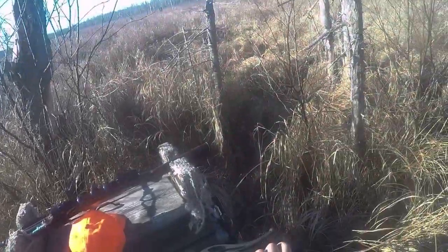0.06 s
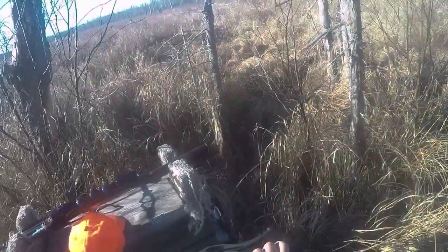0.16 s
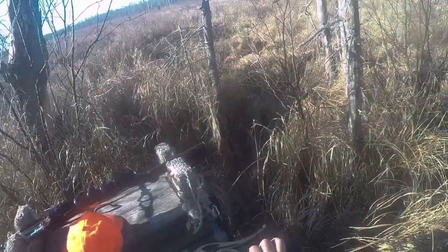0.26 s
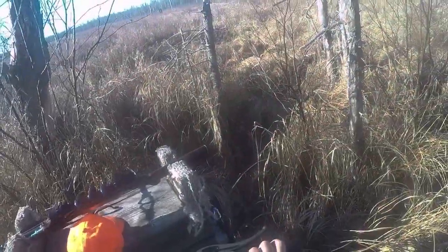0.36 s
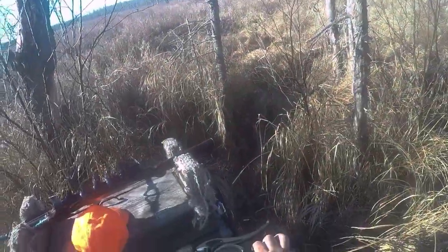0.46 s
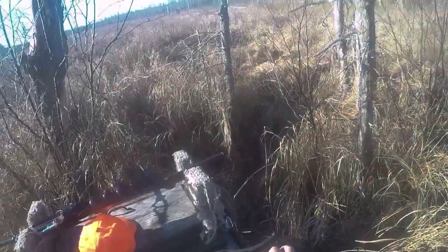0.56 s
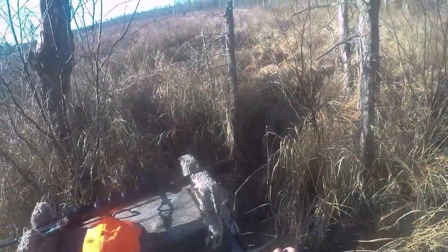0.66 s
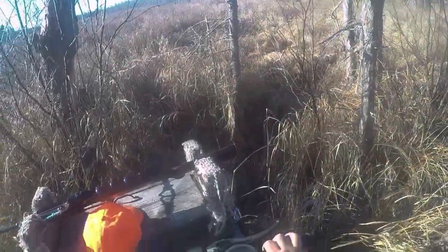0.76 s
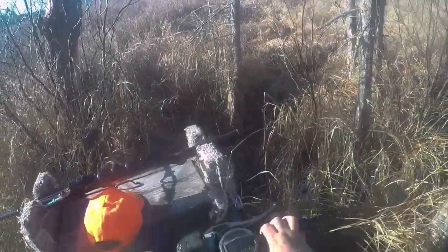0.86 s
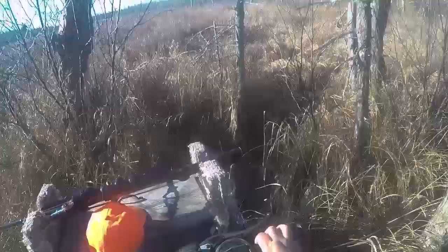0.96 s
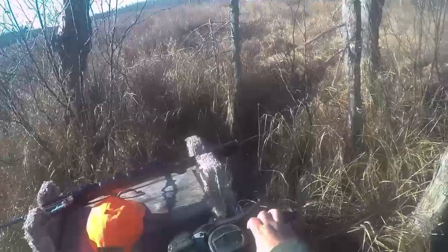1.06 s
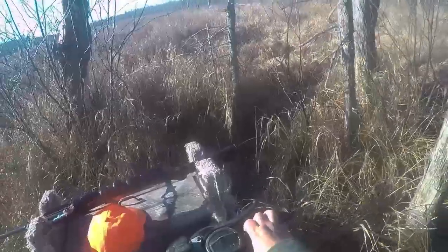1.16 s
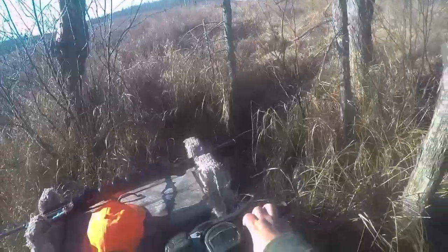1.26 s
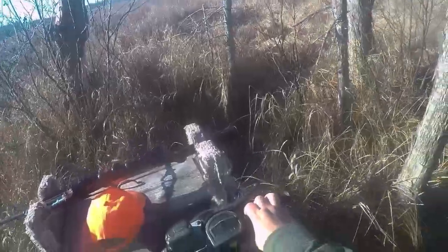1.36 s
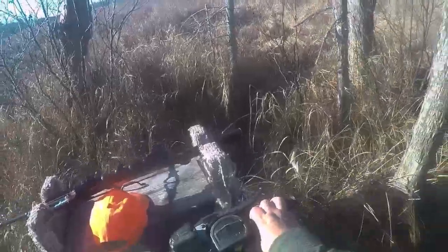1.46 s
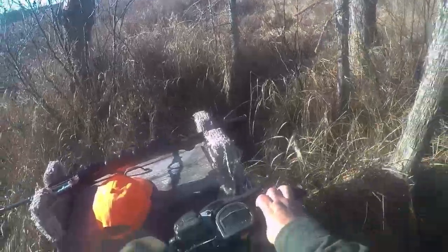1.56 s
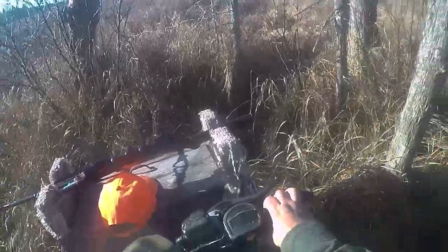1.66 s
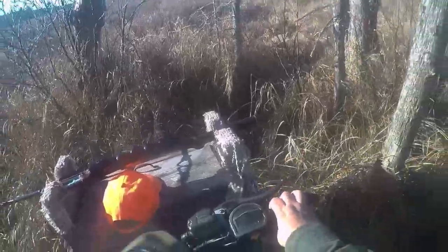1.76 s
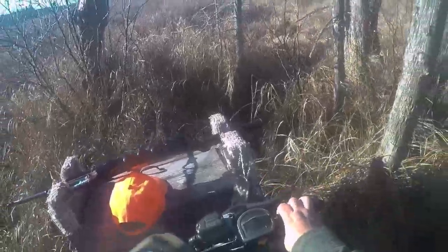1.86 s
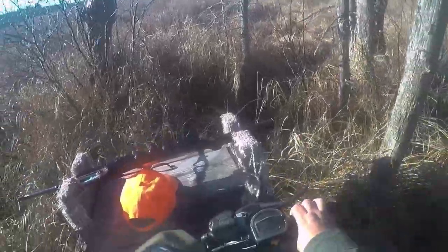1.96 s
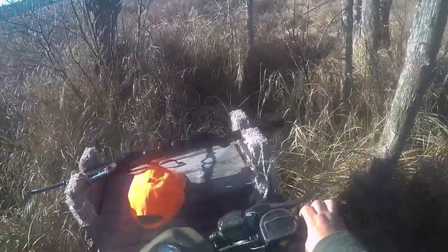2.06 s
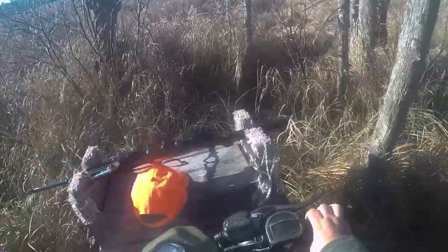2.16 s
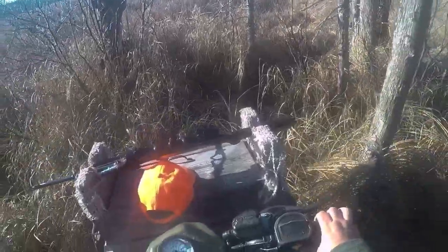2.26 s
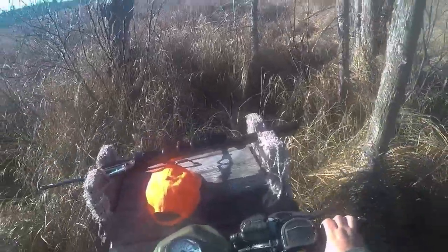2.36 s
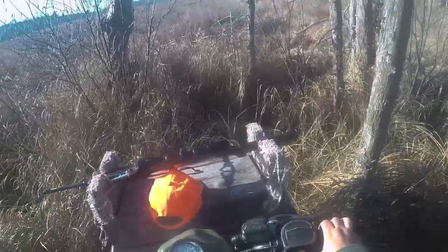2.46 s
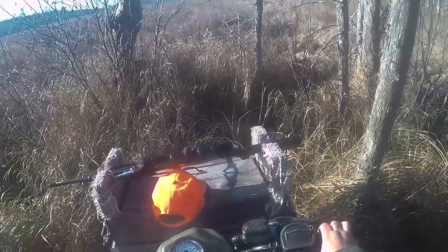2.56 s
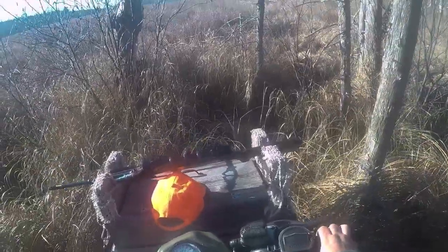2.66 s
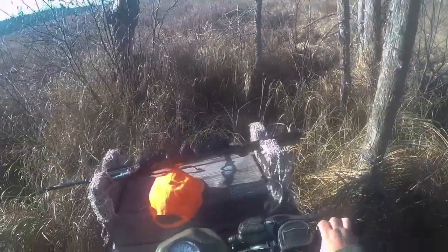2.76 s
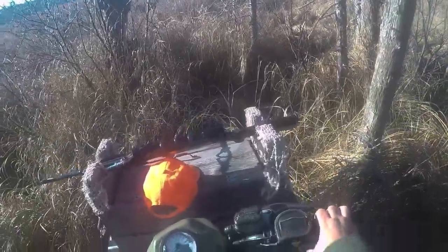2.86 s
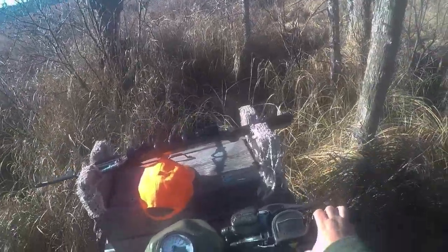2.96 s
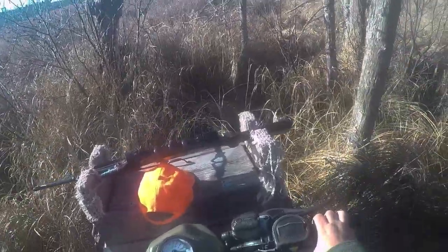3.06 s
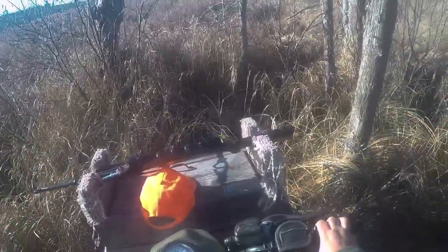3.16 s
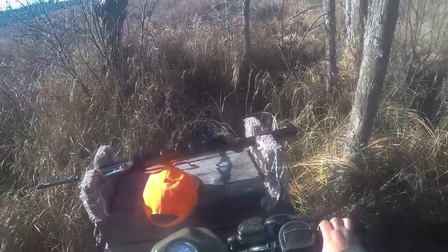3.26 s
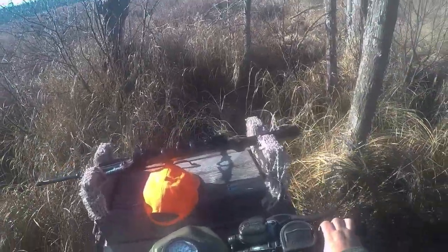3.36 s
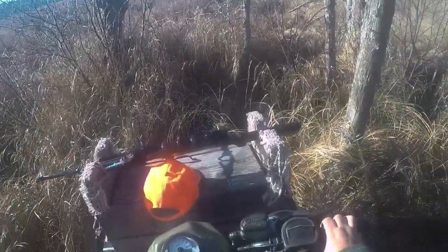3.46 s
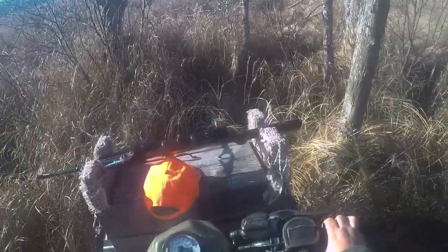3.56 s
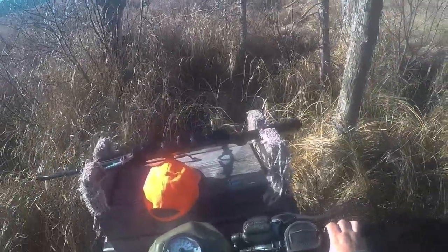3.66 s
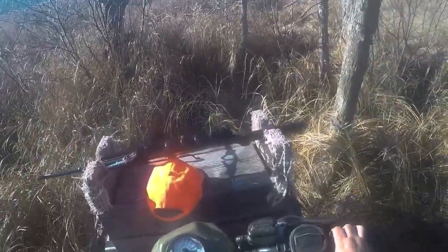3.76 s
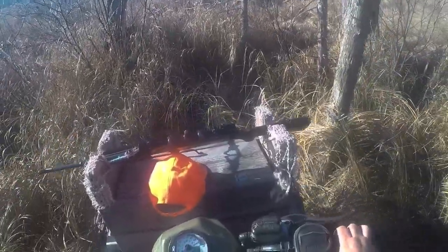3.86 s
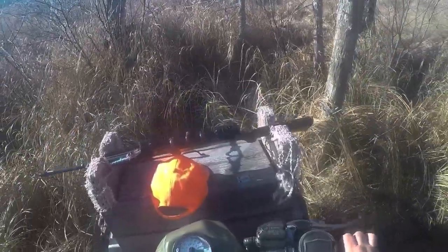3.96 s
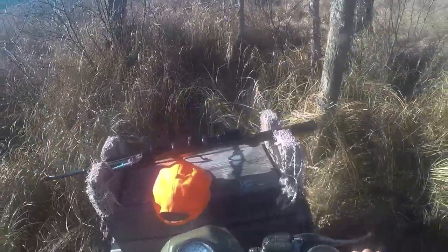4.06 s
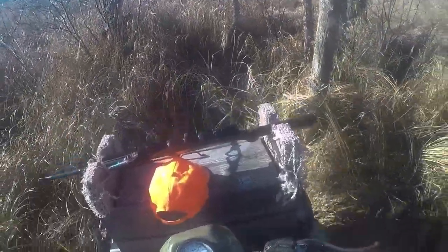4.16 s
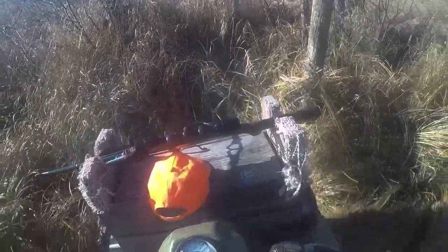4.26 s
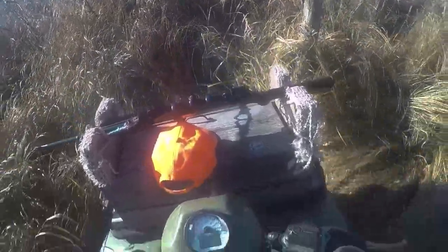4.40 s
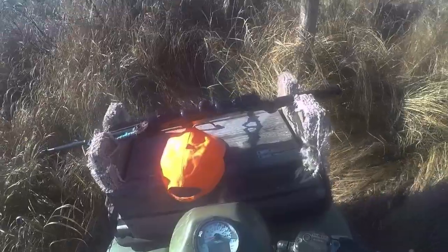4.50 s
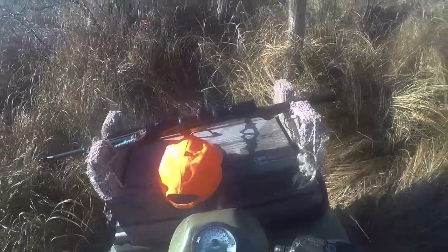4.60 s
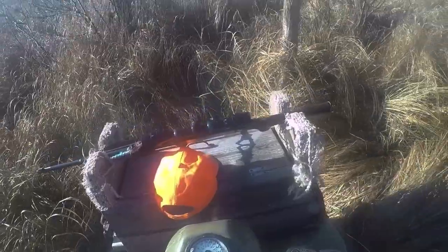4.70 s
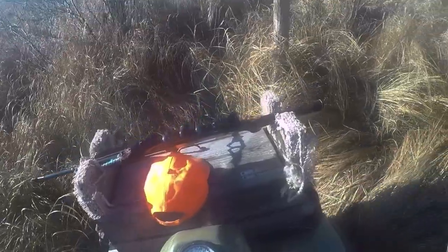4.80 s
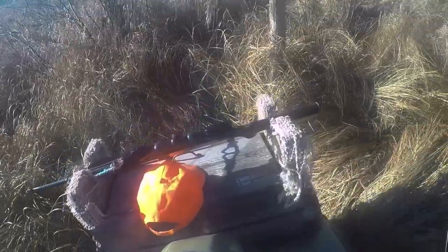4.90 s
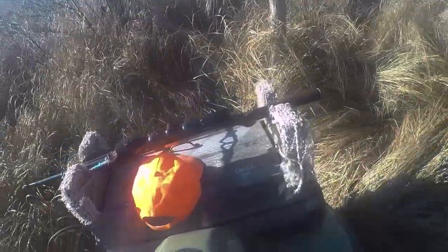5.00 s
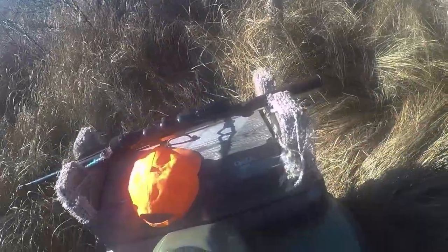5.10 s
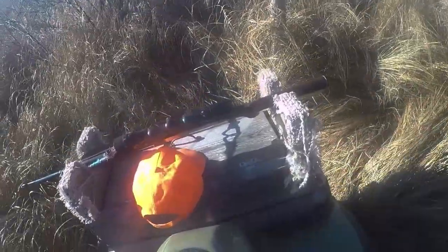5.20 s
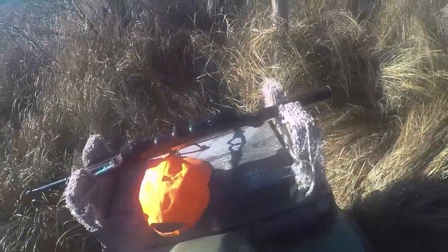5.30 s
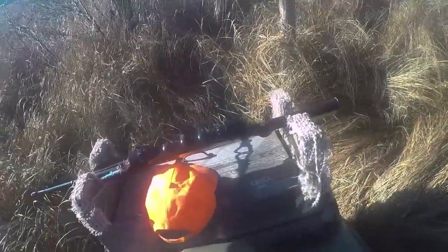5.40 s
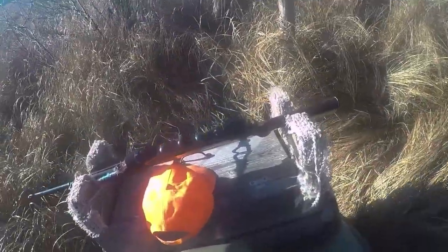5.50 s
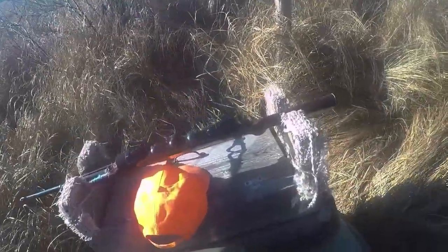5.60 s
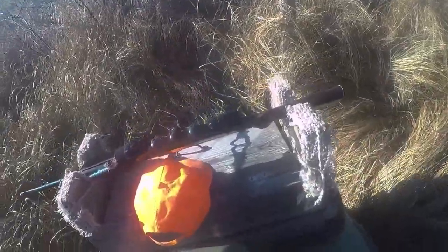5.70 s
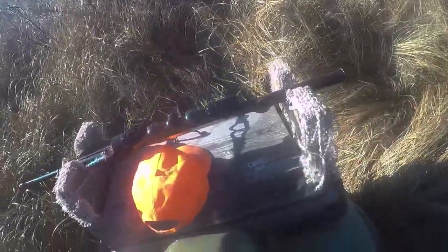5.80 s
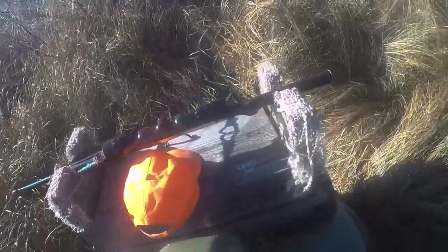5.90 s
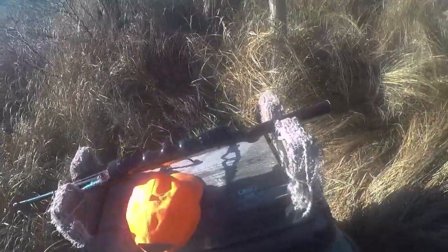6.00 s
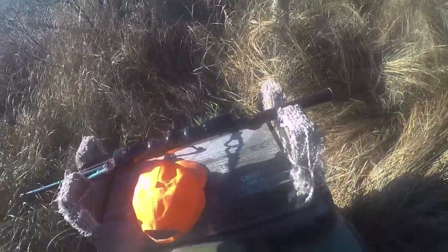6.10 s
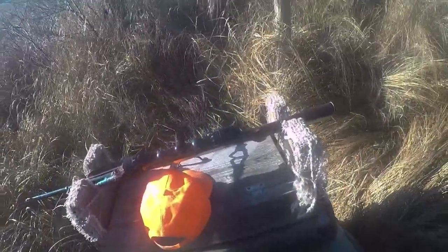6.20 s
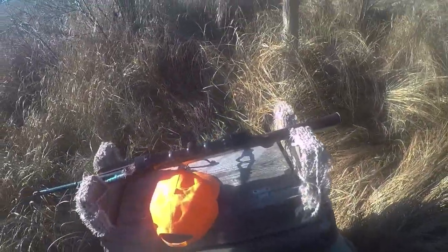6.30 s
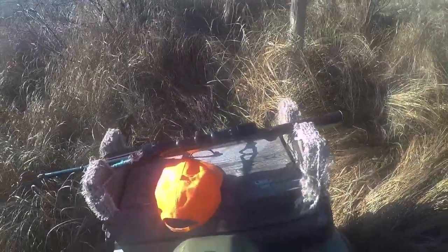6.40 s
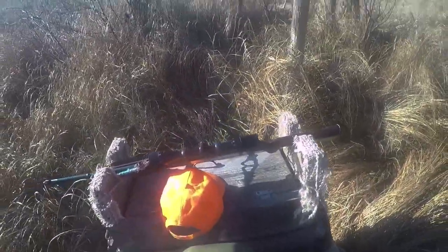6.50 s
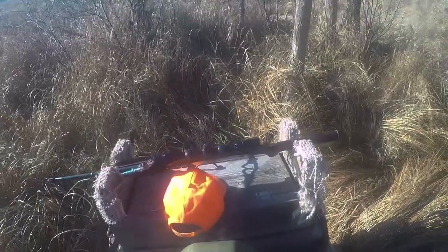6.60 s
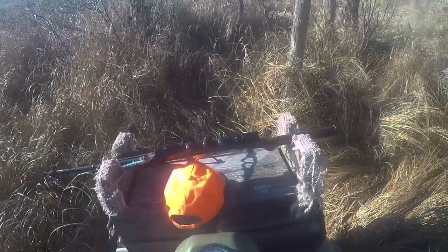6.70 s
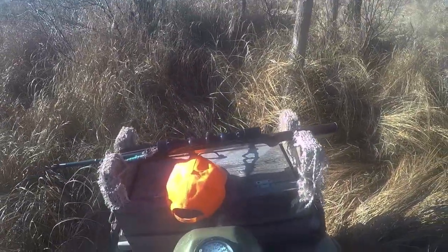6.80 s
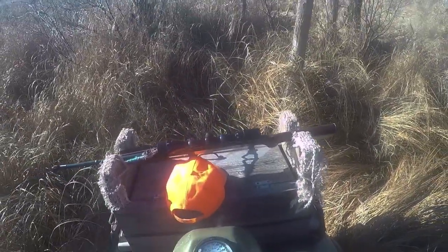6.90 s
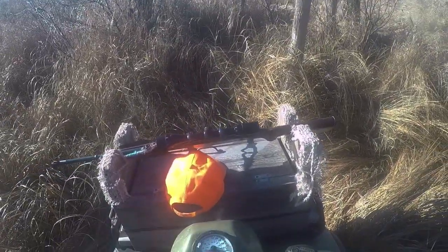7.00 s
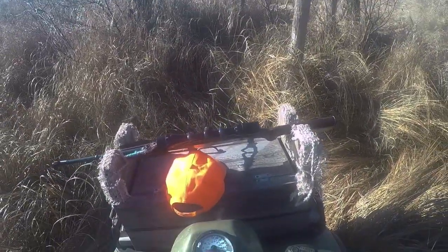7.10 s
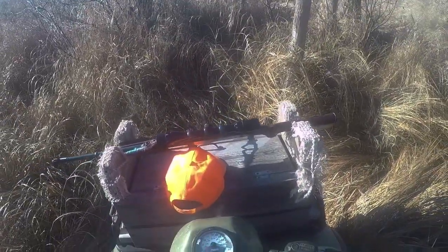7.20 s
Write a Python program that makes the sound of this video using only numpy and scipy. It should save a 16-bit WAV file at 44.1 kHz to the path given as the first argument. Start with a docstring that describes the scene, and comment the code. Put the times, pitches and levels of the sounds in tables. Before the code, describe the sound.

Close on a quad bike from the saddle, outdoors: the single-cylinder engine starts at idle, clanks as it picks up, and growls through three short throttle squeezes and one longer pull. Valve ticks and metallic casing clatter run throughout. Dry grass swishes along the body and stalks snap. The throttle closes, the engine sinks to a slow thudding idle, something knocks a panel, and the revs rise at the end.

```python
"""In tall dry grass a single-cylinder quad bike crawls along, heard from the saddle.
Four squeezes of the throttle, a run-down to a thudding idle, then a fresh pick-up set the firing rate.
Exhaust and induction are harmonics, impulses and filtered noise locked to the firing cycle.
Valves tick and the casing clatters as noise flaring at each contact; clanks mark hard firings.
Grass brushes the body as filtered noise, stalks snap as short bursts, and a knock rings a panel."""
import sys
import numpy as np
from scipy import signal
from scipy.fft import rfft, irfft, next_fast_len
from scipy.io import wavfile
from scipy.ndimage import uniform_filter1d, map_coordinates

SR = 44100
rng = np.random.default_rng(int(sys.argv[2]) if len(sys.argv) > 2 else 0)


def output_pcm(signal):
    """Save a mono or channel-first signal as 16-bit PCM at the path in sys.argv[1].

    Samples are clipped to [-1, 1] before scaling.
    """
    pcm = np.clip(np.atleast_2d(signal).T, -1, 1) * 32767
    wavfile.write(sys.argv[1], SR, np.round(pcm).astype(np.int16))


N = 319725
T = np.arange(N) / SR  # time, s

# Firing rates per second: at idle, where the clutch bites, on the move
IDLE_HZ, CLUTCH_HZ, CRUISE_HZ = 12.436, 18.214, 29
GRIP_HZ = 7.15  # firings/s above its bite at which the clutch holds fully
DRAG_LOAD = 0.26  # greatest load (0-1) as the revs spin with the throttle shut
GULP_DB_PER_HZ = 0.39  # a deeper squeeze breathes louder: dB per firing/s aimed above cruise
BOOM_DB = 3  # added to the shut-throttle exhaust as the revs rise from idle to the clutch bite

# Loudness laws of the engine layers, before each layer's own trim. Each law: base level at idle in dB,
# dB per doubling of speed, dB more under load, dB per firing/s above cruise under load,
# dB more while the revs flare against a slipping clutch.
EXHAUST_LAW = (-21.5, 4.5, 0.3, 0.37, 1.5)
INTAKE_LAW = (-42, 11.5, -1, 0.62, 5)
CASING_LAW = (-45.5, 9.5, 1.5, 0.2, 3.5)
VALVE_LAW = (-54.5, 13, .3, -0.74, 3.5)
# Spectrum of the intake noise. Each row: frequency in Hz, relative level in dB.
INTAKE_SPECTRUM = [(60, -67), (150, 4.5), (250, 4), (340, -0.5), (450, 0), (620, -4), (780, -4), (1100, -8),
                   (1600, -13.5), (4000, -70)]
# Spectrum of the valve ticks. Each row: frequency in Hz, relative level in dB.
VALVE_SPECTRUM = [(1500, -19.5), (4000, -1.5), (6500, -6), (7800, -0.5), (8600, -14), (9400, -2),
                  (10100, -7), (10800, 1.5), (11300, 0.5), (12400, -2), (13000, 8), (13700, -7),
                  (15300, -9.5)]


def engine():
    """Cyclic excitation: exhaust, intake gulps, casing clatter and valve ticks share one firing cycle."""
    speed = revs()
    opening, aim = throttle()
    spin = np.clip((speed - IDLE_HZ) / (CLUTCH_HZ - IDLE_HZ), 0, 1)
    grip = np.clip((speed - CLUTCH_HZ) / GRIP_HZ, 0, 1)
    load = np.clip(np.maximum(opening * grip, DRAG_LOAD * spin), 0, 1)
    flare = opening * (1 - grip)
    cycle = np.cumsum(speed) / SR + .06  # firings so far

    exhaust_db = loudness(EXHAUST_LAW, speed, load, flare)
    casing_db = loudness(CASING_LAW, speed, load, flare)
    intake_db = loudness(INTAKE_LAW, speed, load, flare) + GULP_DB_PER_HZ * aim
    valve_db = loudness(VALVE_LAW, speed, load, flare) + 0.58 * wobble(7)

    growl = amp(intake_db + 6.0) * roar(cycle, speed, waver_db=1.9, drift_db=3.0, even_db=1.5)
    pulling = amp(exhaust_db) * drone(cycle, speed, firing_lead=.1) + growl
    coasting = amp(exhaust_db + BOOM_DB * spin) * thuds(
        cycle, speed, coast_lead_s=0.0098, idle_lead_s=0.0118, ring_lead_s=0.00391, ring_db=-17.5)
    gulps = unit(1 + 0.2 * np.cos(2 * np.pi * (cycle - .75))) * rng.standard_normal(N)
    intake = amp(intake_db - .5 - 4.5 * load) * colour(gulps, INTAKE_SPECTRUM)
    ticks = rattle(cycle, load, t60=0.022, bed=0.093, scatter_db=6.0)
    valves = amp(valve_db - 1.0 + 1.38 * load) * colour(ticks, VALVE_SPECTRUM)
    clatter = amp(casing_db) * casing(cycle, load)
    # the exhaust crossfades at equal power between pulling and coasting
    return np.sqrt(load) * pulling + np.sqrt(1 - load) * coasting + intake + clatter + valves


# Exhaust harmonics under load. Each row: frequency in Hz, relative level of a harmonic there in dB.
LOADED_EXHAUST = [(28, -9), (57, 0), (86, -3), (117, -1)]


def drone(cycle, speed, firing_lead, count=5):
    """Harmonic synthesis: the lowest orders; even follow the crank, odd the firing, a little ahead."""
    tone = 0
    for k in range(1, count):
        turns = cycle + firing_lead * (k % 2)
        tone = tone + amp(along(LOADED_EXHAUST, k * speed)) * np.cos(2 * np.pi * k * turns)
    return -unit(tone)


# Pipe resonances met by the higher harmonics. Each row: frequency in Hz, relative level in dB.
ROAR_SPECTRUM = [(140, 2), (175, -3), (205, 0.5), (232, 1.5), (262, -6.5), (292, -3.5), (322, -6.5),
                 (385, -6.5), (450, -16), (570, -11), (680, -15), (780, -21), (1200, -23.5)]


def roar(cycle, speed, waver_db, drift_db, even_db, order=5, count=40):
    """Source and filter: higher harmonics slide through fixed pipe resonances, each wavering in level."""
    tone = np.zeros(N)
    knots = T[::SR // 25]
    knot_speed = np.interp(knots, T, speed)
    for k in range(order, count):
        level_db = along(ROAR_SPECTRUM, k * knot_speed) + waver_db * rng.standard_normal(len(knots))
        drift = unit(uniform_filter1d(rng.standard_normal(len(knots)), size=14))
        level_db += even_db * (k % 2 == 0) + drift_db * drift
        phase = 2 * np.pi * (k * cycle + rng.random())
        tone += np.interp(T, knots, amp(level_db)) * np.cos(phase)
    return unit(tone)


# Exhaust thud with the throttle shut, above idle. Each row: frequency in Hz, relative level in dB.
COASTING_THUD = [(8, -18), (25, -19.5), (52, -10.5), (71, -3), (79, 8), (87, -2), (118, -12.5),
                 (160, -29.5), (300, -44), (900, -91)]
# Exhaust thud at idle. Each row: frequency in Hz, relative level in dB.
IDLE_THUD = [(4, -33), (14, -8), (30, -18.5), (54, 12), (80, 2.5), (110, -3), (160, -26), (300, -62),
             (900, -103)]
# Hollow ring of the muffler. Each row: frequency in Hz, relative level in dB.
MUFFLER_RING = [(60, -53), (160, -16.5), (218, 5.5), (255, -10.5), (285, -8), (340, -23), (450, -45),
                (600, -28), (1500, -76)]


def thuds(cycle, speed, coast_lead_s, idle_lead_s, ring_lead_s, ring_db):
    """Impulse response: each firing rings the pipe, deeper at idle; the muffler answers just after."""
    size = np.sqrt(SR / speed)  # unit power at any firing rate
    booms = size * strokes(cycle + coast_lead_s * speed, 0, scatter_db=1.6)
    puffs = size * strokes(cycle + idle_lead_s * speed, 0, scatter_db=0.9)
    puffs[0] = size[0]  # the engine is already turning
    slaps = size * strokes(cycle + ring_lead_s * speed, 0, scatter_db=2.5)
    fast = np.clip((speed - 12.5) / 1.6, 0, 1)
    pipe = fast * colour(booms, COASTING_THUD) + (1 - fast) * colour(puffs, IDLE_THUD)
    pipe /= np.sqrt(np.abs(uniform_filter1d(pipe ** 2, SR // 6)) + 1e-9)  # steady running power
    return pipe + amp(ring_db) * colour(slaps, MUFFLER_RING)


def strokes(cycle, phase, scatter_db):
    """Impulse train: one impulse of uneven size each time the engine cycle passes a phase."""
    at = np.flatnonzero(np.diff(np.floor(cycle - phase)) > 0)
    train = np.zeros(N)
    train[at] = amp(scatter_db * rng.standard_normal(512)[:len(at)])
    return train


# Broad clatter of the casing. Each row: frequency in Hz, relative level in dB.
CASING_SPECTRUM = [(500, -33), (1100, -3), (1500, -4.5), (1850, -3.5), (2300, -9), (3300, -6.5),
                   (4500, -9.5), (5300, -12), (6800, -20.5), (9000, -16), (15000, -34)]
# Ringing modes of the casing. Each row: frequency in Hz, bandwidth in Hz, level in dB when pulling,
# level in dB with the throttle shut, both before a slow random drift.
CASING_MODES = [(1276, 74, -10.5, -13), (1442, 110, -14, -26), (2066, 20, -14, -13), (2558, 220, -7.5, -9),
                (2923, 120, -10, -11), (3746, 59, -12, -14.5), (4150, 100, -12, -12),
                (5900, 140, -19, -21.5)]


def casing(cycle, load):
    """Modal resonance: broad clatter plus modes, each with its own strikes, slowly coming and going."""
    clatter = rattle(cycle, load, t60=0.028, bed=0.82, scatter_db=2.0)
    sound = amp(-2.5) * colour(clatter, CASING_SPECTRUM)
    for hz, width, pull_db, shut_db in CASING_MODES:
        ring = resonate(rattle(cycle, load, t60=0.045, bed=0.84, scatter_db=5.0), hz, width)
        drift_db = 1.8 * wobble(4)
        sound += amp(load * pull_db + (1 - load) * shut_db + drift_db) * ring
    return sound


# Valve gear contacts in each cycle. Each row: phase (0-1), strength in dB weighted by the load,
# strength in dB weighted by 1.5 minus the load.
VALVE_CONTACTS = [(0.169, -37, 0), (0.239, -1, -1.5), (0.292, -10, 2), (.55, -11, -3.5), (0.64, -1, -4),
                  (0.729, 1, -7), (.79, -1.5, -4), (.95, -1, -4.5)]


def rattle(cycle, load, t60, bed, scatter_db):
    """Modulated noise: it flares at each loosely timed contact over a running bed; mean power near 1."""
    phase, hard_db, soft_db = np.transpose(VALVE_CONTACTS)
    turns = np.arange(int(cycle[-1]) + 1)[:, None]
    slack, force = rng.standard_normal((2, len(turns), len(VALVE_CONTACTS)))
    at = np.minimum(np.searchsorted(cycle, turns + phase + .012 * slack), N - 1)
    size = amp(load[at] * hard_db + (1.5 - load[at]) * soft_db + scatter_db * force)
    size = size * (at < N - 1)  # drop contacts past the end
    hits = np.bincount(at.ravel(), size.ravel() ** 2, N)
    power = signal.lfilter([1], [1, -amp(-60 / (t60 * SR)) ** 2], hits)  # falls 60 dB in t60
    power /= np.abs(uniform_filter1d(power, SR // 3)) + 1e-9
    return np.sqrt((power + abs(bed)) / (1 + abs(bed))) * rng.standard_normal(N)


def loudness(law, speed, load, flare):
    """Power law: the level in dB of an engine layer follows speed, load and free revving."""
    idle_db, doubling_db, load_db, strain_db, flare_db = law
    speed_db = doubling_db * np.log2(speed / IDLE_HZ)
    return idle_db + speed_db + load * (load_db + strain_db * (speed - CRUISE_HZ)) + flare_db * flare


# Squeezes of the throttle. Each row: start of the rise in seconds, start of the fall in seconds,
# speed it pulls towards in firings/s, lag of the climb in seconds.
SQUEEZES = [(0.164, 0.717, 31.82, 0.286), (0.84, 1.518, 32.658, 0.715), (1.684, 2.095, 33.553, 0.333),
            (2.384, 4.215, 29.381, 0.122), (7.116, 7.6, 29, 0.3)]
# The engine bogs in thick grass, and later undershoots its idle. Each row: middle in seconds,
# firings/s lost, width in seconds.
SPEED_SAGS = [(3.142, 1.526, 0.349), (5.023, 1.328, 0.565)]
FLARE_HZ_PER_S, RUN_DOWN_S = 69.152, .29  # fastest climb of the revs; lag of their fall, throttle shut


def revs():
    """First-order lag: revs flare until the clutch drags them into a slow climb; shut, they run down."""
    speed = np.full(N, float(IDLE_HZ))
    for opens, shuts, top, lag in SQUEEZES:
        age, start = np.maximum(T - opens, 0), np.interp(opens, T, speed)
        climb = top - (top - max(start, CLUTCH_HZ)) * np.exp(-age / lag)
        speed = np.where(T > opens, np.minimum(start + FLARE_HZ_PER_S * age, climb), speed)
        excess = np.interp(shuts, T, speed) - IDLE_HZ
        fall = excess * np.exp(-np.maximum(T - shuts, 0) / RUN_DOWN_S)
        speed = np.where(T > shuts, IDLE_HZ + fall, speed)
    return speed - sum(lost * swell(s, width) for s, lost, width in SPEED_SAGS)


OPEN_LEAD_S, OPEN_S, SHUT_S = 0.057, 0.044, 0.051  # lead over the revs; time to open; time to shut


def throttle():
    """Linear ramps: how far the throttle is open (0-1), and how far above cruise it aims (firings/s)."""
    opening, aim = np.zeros(N), np.zeros(N)
    for opens, shuts, top, lag in SQUEEZES:
        rise = (T - opens + OPEN_LEAD_S) / OPEN_S
        squeeze = np.clip(np.minimum(rise, 1 - (T - shuts) / SHUT_S), 0, 1)
        opening = np.maximum(opening, squeeze)
        aim = aim + squeeze * (top - CRUISE_HZ)
    return opening, aim


# Hard firing strokes that clank as the engine picks up. Each row: start in seconds,
# relative level in dB.
CLANKS = [(0.121, -17.5), (0.187, -16.5), (0.24, -19), (0.289, -16.5), (0.332, -16.5), (7.101, -18),
          (7.161, -18.5), (7.214, -18)]


def clanks():
    """Transient excitation: hard firings jolt the casing, most of all around its lowest mode."""
    jolts = sum(amp(db - 15) * burst(s, t60=0.046) for s, db in CLANKS)
    return colour(jolts, CASING_SPECTRUM) + amp(-0.5) * resonate(jolts, hz=1280, width=170)


# Hard knocks on the bodywork. Each row: start in seconds, relative level in dB.
KNOCKS = [(5.866, -18.5)]
# Modes of the struck body panel. Each row: frequency in Hz, relative level in dB,
# time to fall 60 dB in seconds.
PANEL_MODES = [(376, 0.5, 0.071), (535, 6, 0.062), (640, 4, 0.089), (805, -5, .05), (943, 8.5, 0.026),
               (1263, -3.5, 0.063), (1520, -7.5, 0.091), (2340, -2.5, 0.033)]
# Contact noise of the knock. Each row: frequency in Hz, relative level in dB.
CRACK_SPECTRUM = [(300, -8), (700, 7), (1500, -8.5), (4100, -10), (5500, -15.5), (13000, -18), (15000, -25)]


def knocks():
    """Modal decay: something hard strikes a well-damped panel, giving a crack and a short woody ring."""
    sound = np.zeros(N)
    for s, db in KNOCKS:
        age = np.clip(T - s, 0, 1)
        ring = np.zeros(N)
        for k, (hz, level, t60) in enumerate(PANEL_MODES):
            ring += amp(level - 60 * age / t60) * np.sin(2 * np.pi * hz * age) * (-1) ** k
        sound += amp(db - 5.0) * ring + amp(db - 3.5) * colour(burst(s, t60=0.089), CRACK_SPECTRUM)
    return sound


# Stalks snapping. Each row: start in seconds, relative level in dB, centre in Hz,
# time to fall 60 dB in seconds.
SNAPS = [(1.6708, -16.5, 2050, 0.018), (1.926, -18, 2480, 0.014), (2.373, -14, 3700, 0.014),
         (3.3812, -22, 4150, 0.011), (5.7036, -24, 5770, 0.027), (5.7073, -36, 3830, 0.016),
         (5.789, -34, 2540, 0.015), (6.245, -18, 3070, 0.0068), (7.215, -28, 4270, 0.012)]


def snaps():
    """Brittle fracture: each breaking stalk is a short noise burst with its own spectral peak."""
    sound = np.zeros(N)
    for s, db, hz, t60 in SNAPS:
        spectrum = [(hz / 8, -25), (hz / 2, -5), (hz, 0), (hz * 3, -12)]
        sound += amp(db - 4.5) * colour(burst(s, t60), spectrum, size=2048)
    return sound


# Spectrum of the grass. Each row: frequency in Hz, relative level in dB.
BLADE_SPECTRUM = [(400, 8.5), (1500, -10.5), (3500, -11), (6300, -7.5), (9000, -0.5), (12000, 3),
                  (15300, -1.5)]
# Thick tussocks pushed aside. Each row: peak time in seconds, level in dB before flutter and crackle,
# rise in seconds, fall in seconds.
TUSSOCKS = [(.62, -37.5, .2, 0.29), (1.05, -39, .1, 0.35), (1.85, -38, .3, 0.97), (3.3, -58, 0.11, .2),
            (4.43, -32.5, 0.58, .15), (5.0, -47, 0.55, .25)]
GRASS_REST_DB, GRASS_ROLL_DB = -58, -43.5  # before flutter and crackle: always present, added by rolling


def grass():
    """Friction noise: blades swish along the rolling body, louder in tussocks, with small crackles."""
    power = amp(GRASS_REST_DB) ** 2 + (amp(GRASS_ROLL_DB) * rolling()) ** 2
    for s, db, rise, fall in TUSSOCKS:
        envelope = np.exp(-np.abs(T - s) / np.where(T < s, rise, fall))
        power = power + (amp(db) * envelope) ** 2
    crackles = rng.random(N) < 150 / SR  # about 150 a second
    crackles = crackles * rng.standard_normal(N) * amp(2 * rng.standard_normal(N))
    swish = rng.standard_normal(N) + 0.38 * unit(crackles)
    return np.sqrt(power) * amp(0.71 * wobble(11)) * colour(swish, BLADE_SPECTRUM)


GATHER_S, ROLL_OUT_S = 0.23, 1.5  # time from rest to full pace, time to roll to a stop


def rolling():
    """Uniform acceleration: ground speed (0-1) gathers during each squeeze and runs out after it."""
    pace = np.zeros(N)
    for opens, shuts, top, lag in SQUEEZES:
        gathering = np.minimum(np.interp(opens, T, pace) + (T - opens) / GATHER_S, 1)
        pace = np.where(T > opens, gathering, pace)
        slowing = np.maximum(np.interp(shuts, T, pace) - (T - shuts) / ROLL_OUT_S, 0)
        pace = np.where(T > shuts, slowing, pace)
    return pace


# Spells of faint hiss. Each row: middle in seconds, level in dB,
# half length in seconds (to 1/e of the peak).
SIZZLES = [(5.08, -54.5, .25), (6.9, -54.5, 0.41)]


def sizzle():
    """Narrow-band noise: a faint hiss through one resonance comes and goes."""
    level = sum(amp(db) * swell(s, width) for s, db, width in SIZZLES)
    return level * resonate(rng.standard_normal(N), hz=5350, width=620)


def amp(db):
    """Logarithmic level: decibels to gain."""
    return 10 ** (np.asarray(db) / 20)


def unit(x):
    """Normalisation: scale to rms 1."""
    return x / np.sqrt(np.mean(x ** 2) + 1e-20)


def along(points, hz):
    """Interpolation: read (Hz, value) points on a log frequency axis."""
    f, v = np.transpose(points)
    return np.interp(np.log(hz + 1), np.log(f + 1), v)


def wobble(rate):
    """Band-limited fluctuation: a smooth random curve, rate knots a second."""
    return map_coordinates(rng.standard_normal(int(N * rate / SR) + 4), [T * rate], order=2)


def swell(s, width):
    """Gaussian envelope: a bell of height 1 around time s."""
    return np.exp(-((T - s) / width) ** 2)


def burst(s, t60):
    """Exponential decay: noise that starts at s and falls 60 dB in t60."""
    age = T - s
    return (age >= 0) * amp(-60 * np.abs(age) / t60) * rng.standard_normal(N)


def resonate(x, hz, width):
    """Second-order resonance: ring one mode; white noise keeps its power."""
    b, a = signal.iirpeak(hz, hz / width, SR)
    return signal.lfilter(b, a, x) * np.sqrt(SR / (np.pi * width))


def colour(x, points, size=16384):
    """Minimum-phase filtering: pass x through a causal unit-energy body with the given spectrum."""
    hz = np.fft.rfftfreq(size, 1 / SR)
    cepstrum = irfft(np.log(amp(along(points, hz))))
    # fold the cepstrum onto positive time to make the response causal
    cepstrum[1:size // 2] *= 2
    cepstrum[size // 2 + 1:] = 0
    response = irfft(np.exp(rfft(cepstrum)))
    return signal.fftconvolve(x, response / np.linalg.norm(response))[:N]


def scene():
    """Superposition: the machine and the grass around it add in the open air."""
    return (engine() + clanks() + sizzle() + grass() + snaps() + knocks())[None]


TOP_HZ = 15400  # upper band limit


def record(dry):
    """Band limitation: a sharp low-pass keeps nothing from the band limit upward."""
    size = next_fast_len(N + SR // 4)
    passed = np.fft.rfftfreq(size, 1 / SR) < TOP_HZ
    return irfft(rfft(dry, size) * passed, size)[..., :N]


dry = scene()
out = record(dry)
output_pcm(out)
```